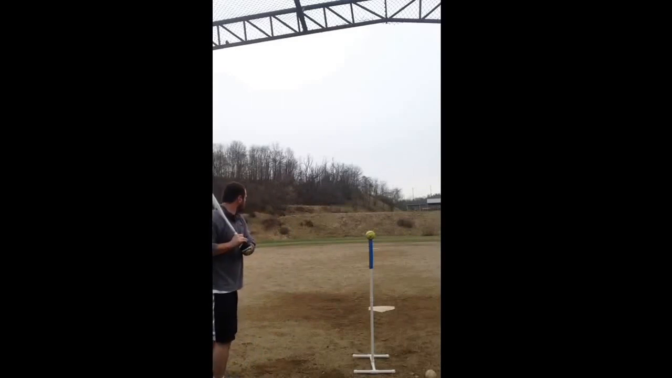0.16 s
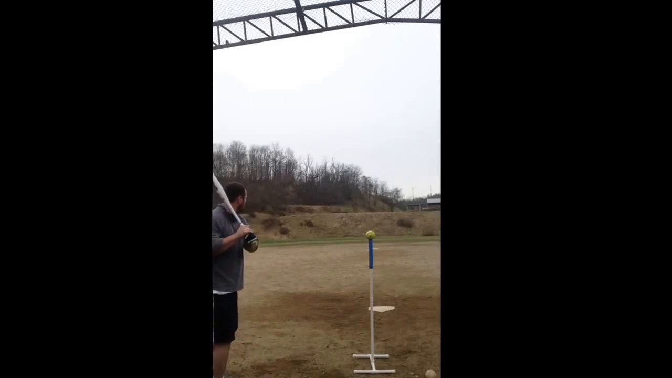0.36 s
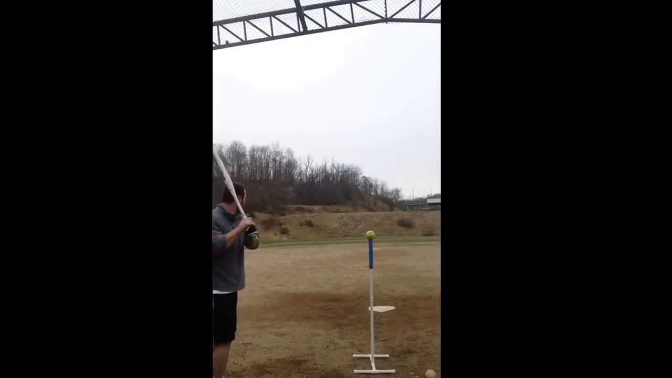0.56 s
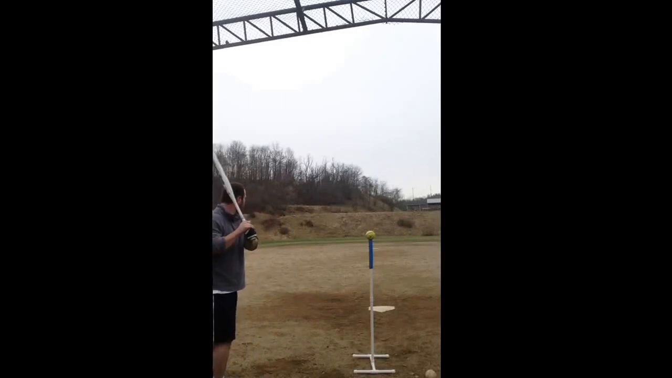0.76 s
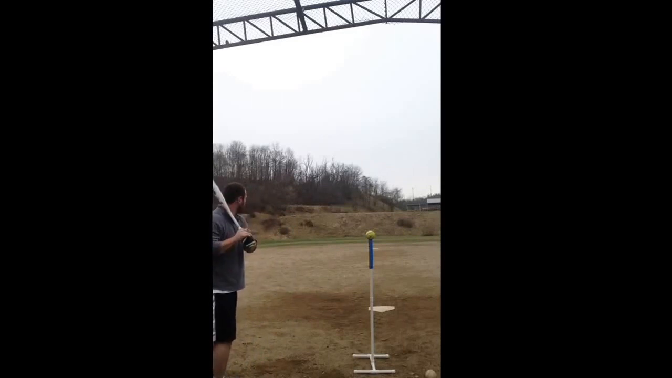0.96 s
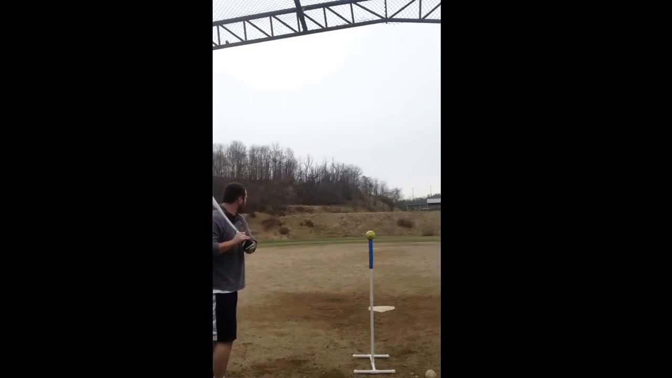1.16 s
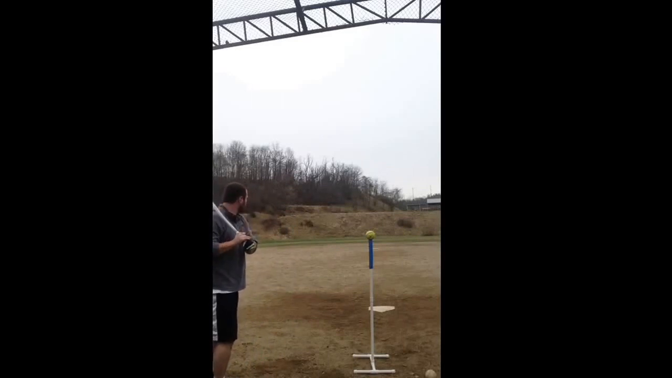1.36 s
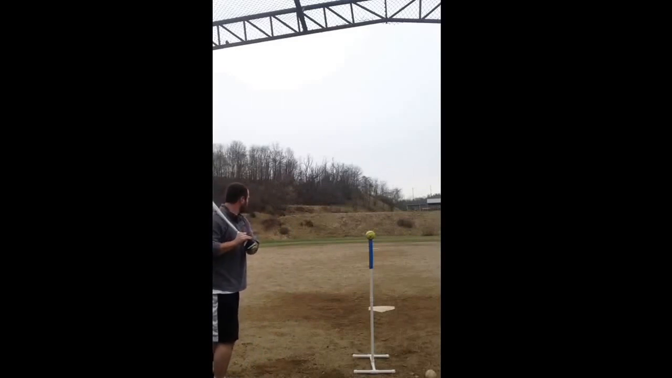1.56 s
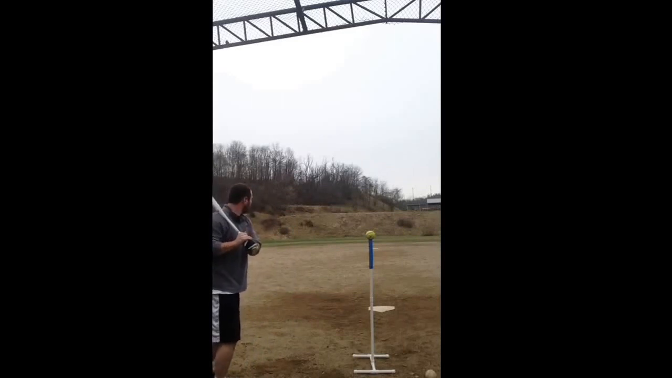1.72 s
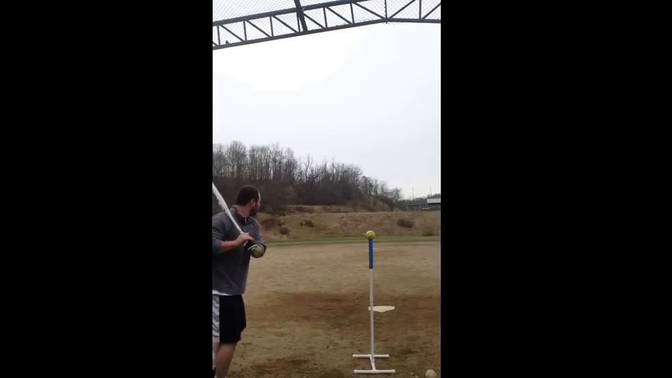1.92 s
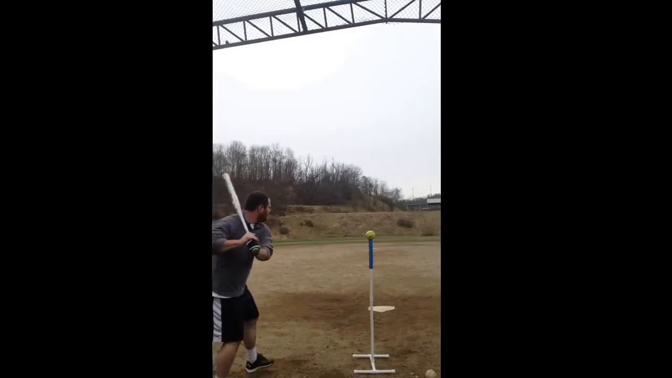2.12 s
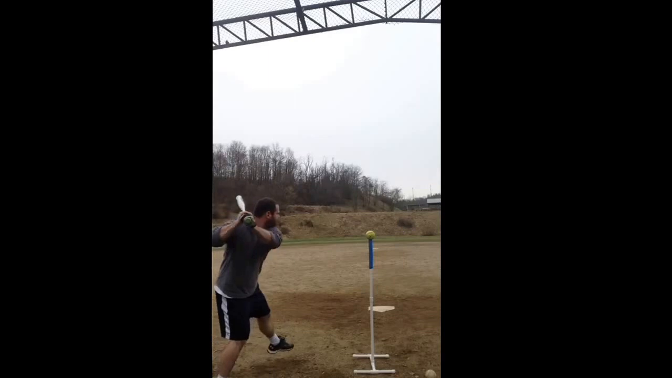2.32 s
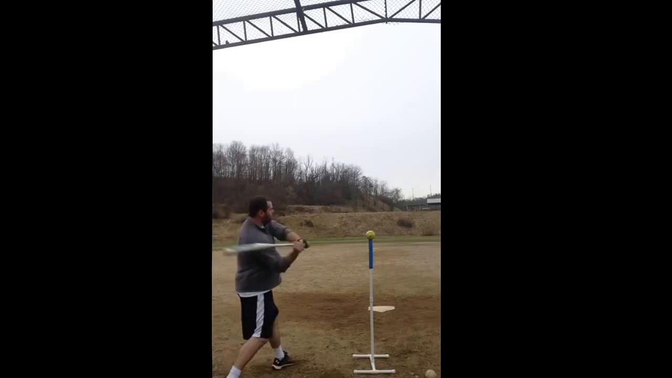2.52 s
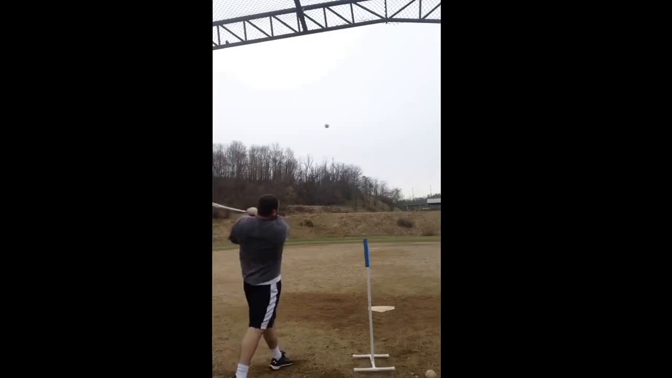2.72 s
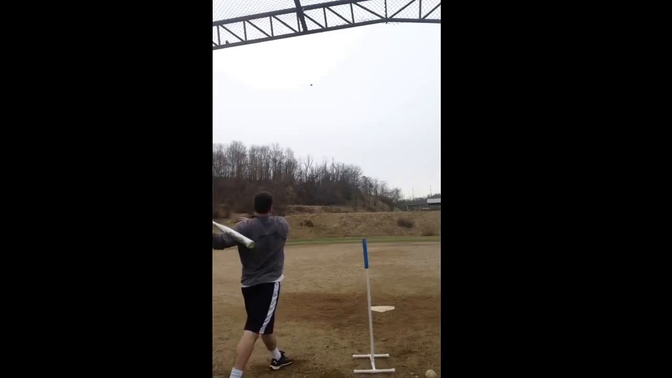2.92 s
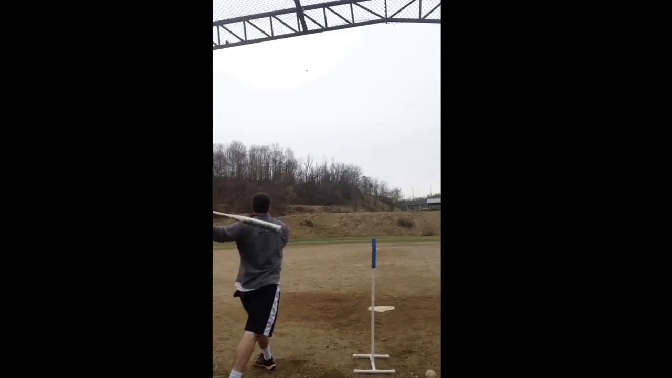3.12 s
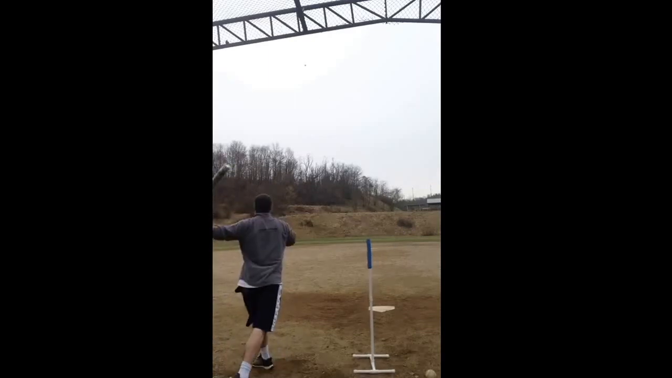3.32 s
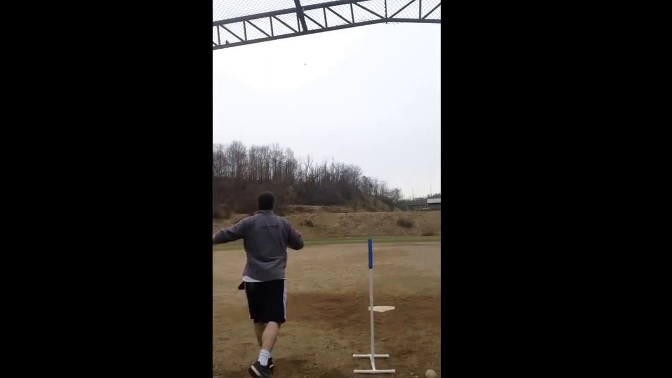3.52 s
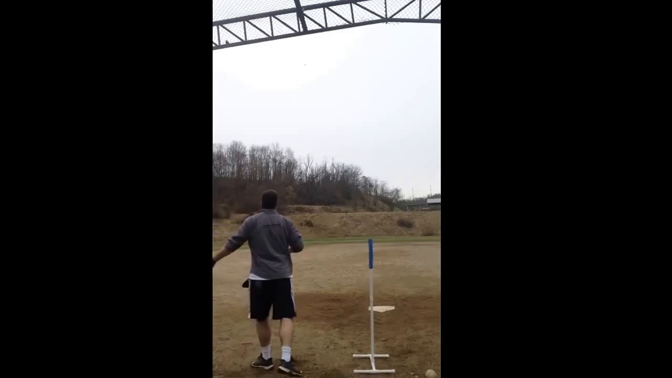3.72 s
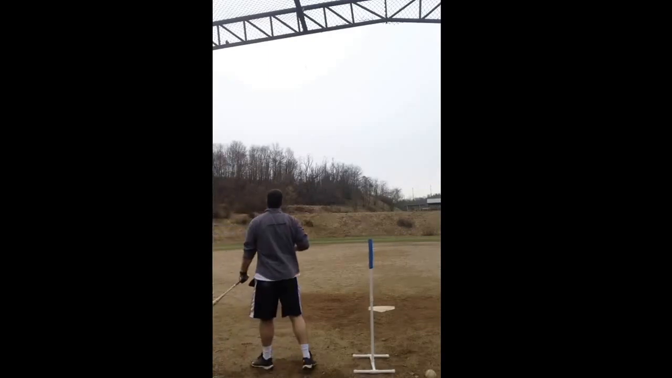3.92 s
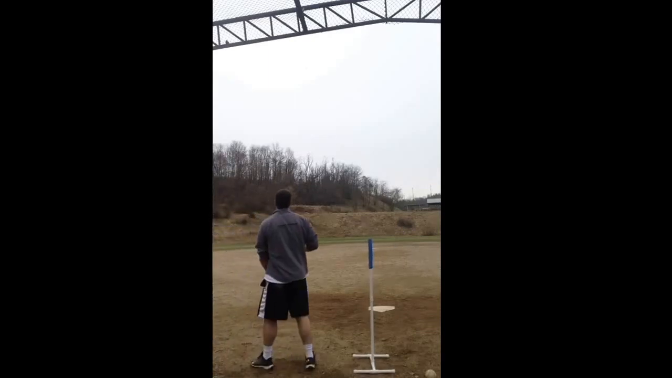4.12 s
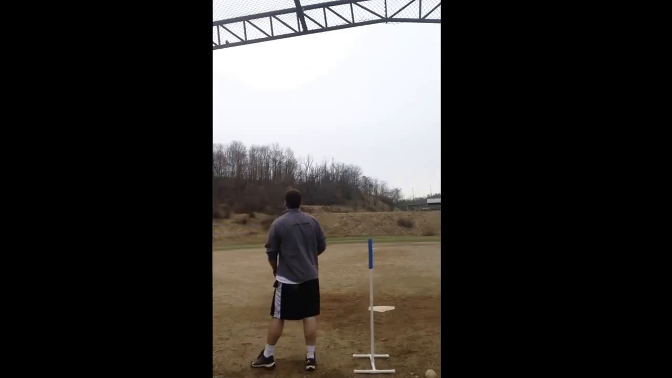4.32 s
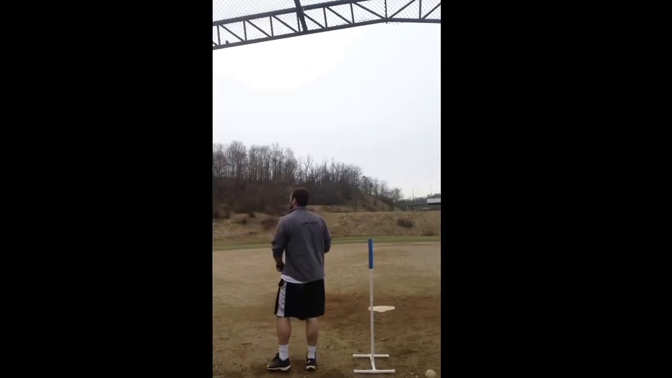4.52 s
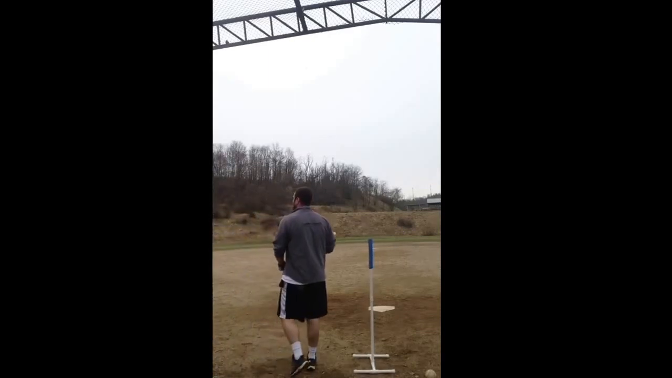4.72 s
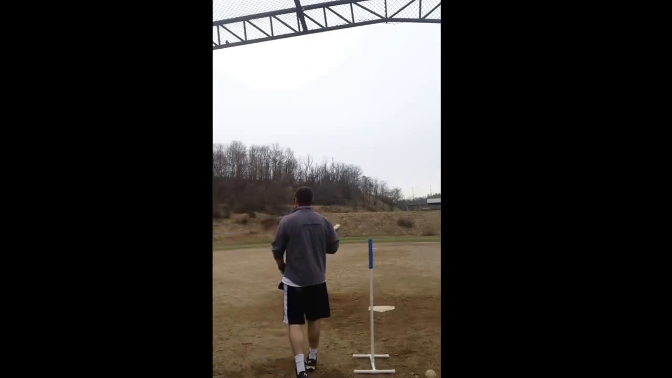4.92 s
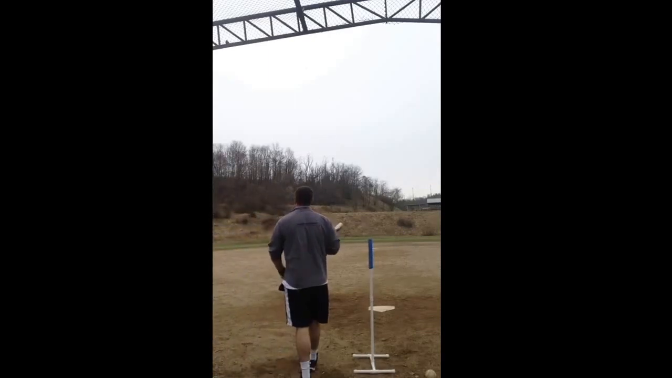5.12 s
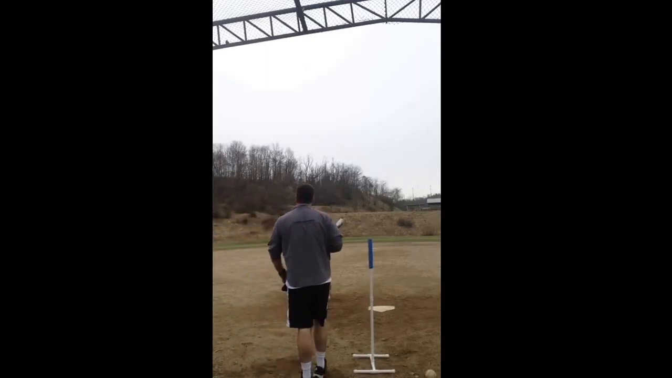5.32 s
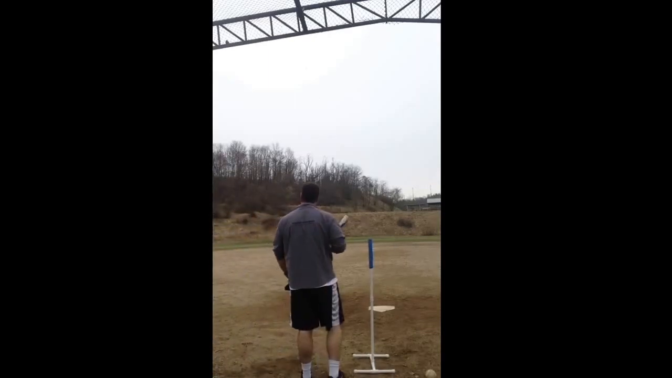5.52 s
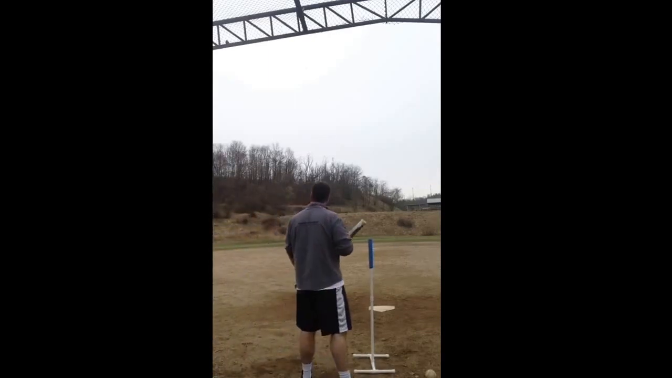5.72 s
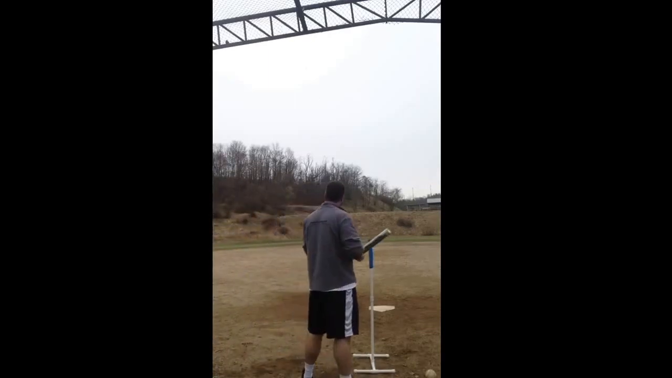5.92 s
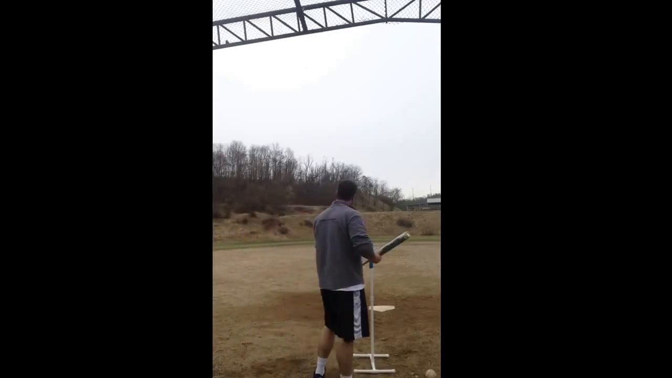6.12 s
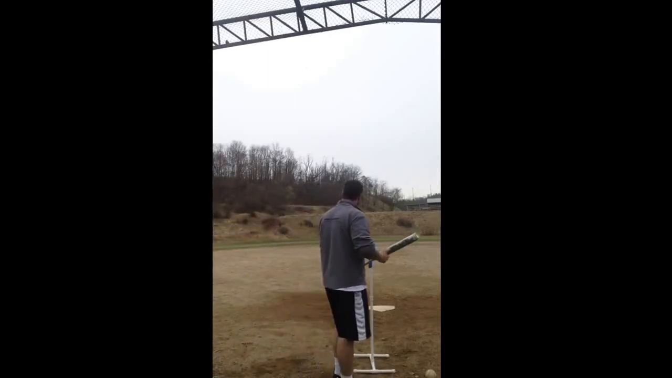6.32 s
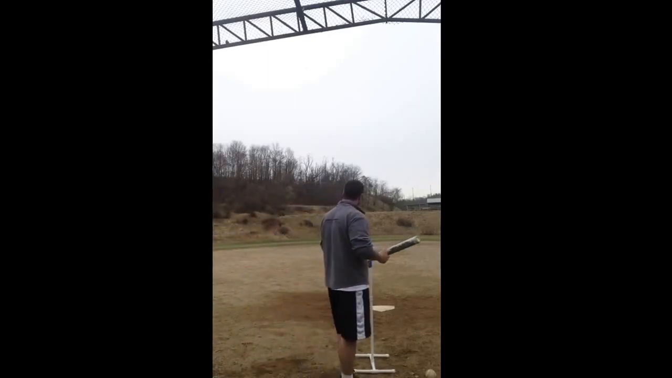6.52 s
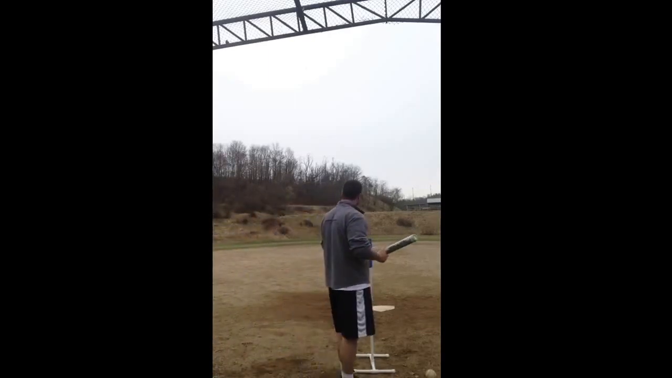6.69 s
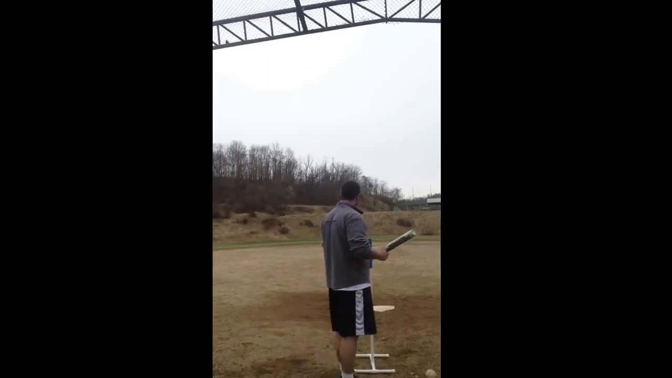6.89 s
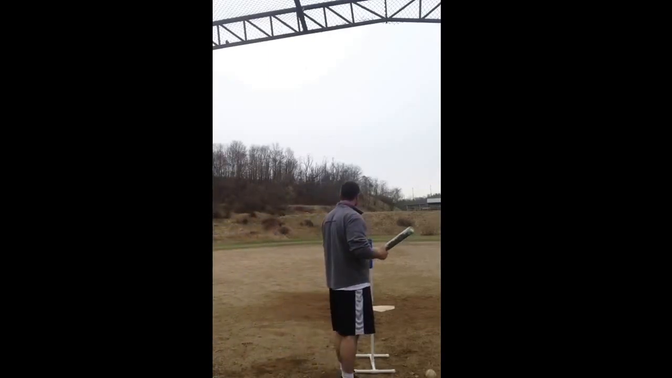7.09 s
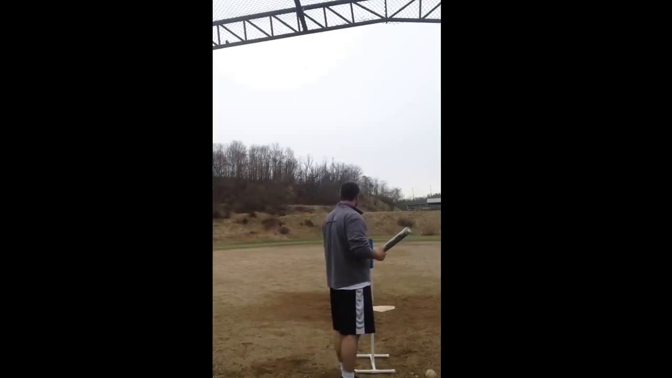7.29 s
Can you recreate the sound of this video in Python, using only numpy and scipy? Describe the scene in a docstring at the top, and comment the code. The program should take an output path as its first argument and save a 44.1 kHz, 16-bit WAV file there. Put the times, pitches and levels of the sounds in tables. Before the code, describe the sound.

A quiet open-air field heard by one microphone near a batter under a steel shelter. From 0 s, low road rumble and a faint far engine hum that fades until about 1.6 s; tiny bird chips at 0.3-0.8 s, a liquid warble and brief buzzy trill near 1 s, a slurred call at 1.5 s, and distant whistles around 2 s with tree echo. Shoes slide on grit at 2.3 s and stamp at 2.37 s. A short swish surges into a huge, sharp, dry bat crack at 2.57 s, with a very short shelter reflection and a faint far echo. The background is ducked, recovering slowly. Cloth rustle and light scuffs run to 3.2 s, a firmer step at 3.95 s, then soft ones at 4.2, 4.8 and 5.7 s. Birds sing again from 4 s. The engine's low drone, pulsing near 3.5 s, swells until 7.35 s.

```python
"""Softball struck off a tee

A batter plants his foot, swings and cracks a softball under an open steel shelter, then shuffles over dirt.
Damped modes and a noise snap make the blow; shaped noise makes its far echo, swish, cloth, grit and traffic.
Songbirds at the tree line are gliding sines with echoes; a far V8 drones closer as harmonics of its cycle.
An automatic gain control ducks at the crack and creeps back."""
import sys
import numpy as np
from scipy import signal
from scipy.fft import rfft, irfft, next_fast_len
from scipy.io import wavfile
from scipy.ndimage import uniform_filter1d, map_coordinates

SR = 44100
rng = np.random.default_rng(int(sys.argv[2]) if len(sys.argv) > 2 else 0)


def pcm_store(signal):
    """Save signal as 16-bit PCM."""
    levels = np.round(np.clip(np.atleast_2d(signal), -1, 1) * 32767)
    wavfile.write(sys.argv[1], SR, levels.astype(np.int16).T)


N = 324135
TIME = np.arange(N) / SR  # [s]


def amp(db):
    """Logarithmic level: decibels become a linear amplitude ratio."""
    return 10 ** (np.asarray(db) / 20)


def unit(x):
    """Normalization: scale a signal to an rms of 1."""
    return x / np.sqrt(np.mean(x ** 2) + 1e-20)


def along(points, hz):
    """Interpolation on a logarithmic frequency axis through (frequency [Hz], value) points."""
    f, v = np.transpose(points)
    return np.interp(np.log(hz + 1), np.log(f + 1), v)


def curves(rows):
    """Linear interpolation in time: one value per sample for each column after the time."""
    s, *columns = np.transpose(rows)
    return [np.interp(TIME, s, column) for column in columns]


def wobble(rate):
    """Band-limited random modulation: a spline through random knots, rate of them a second."""
    knots = rng.standard_normal(int(N * rate / SR) + 4)
    return map_coordinates(knots, [TIME * rate])


def filtered(x, response):
    """Linear filtering: multiply the spectrum by a response of frequency."""
    size = next_fast_len(len(x) + 8192)
    hz = np.fft.rfftfreq(size, 1 / SR)
    return irfft(rfft(x, size) * response(hz), size)[:len(x)]


def noise(spectrum, size=N):
    """Coloured noise: white noise shaped by a spectral density, at an rms of 1."""
    white = rng.standard_normal(size)
    return unit(filtered(white, lambda hz: amp(along(spectrum, hz))))


def add(track, s, sound):
    """Superposition: mix a sound into the track at time s."""
    part = track[max(0, round(s * SR)):][:len(sound)]
    part += sound[:len(part)]


def swell(s, hold, db, rise_db_per_s, fall_db_per_s):
    """Exponential growth and decay: the gain climbs to db at time s, holds and falls away."""
    below_before = rise_db_per_s * np.maximum(s - TIME, 0)
    below_after = fall_db_per_s * np.maximum(TIME - s - hold, 0)
    return amp(db - below_before - below_after)


def dying_noise(decay):
    """Frequency-dependent reverberation: a second of noise whose bands each die at their own rate."""
    hz, t, bins = signal.stft(rng.standard_normal(SR), SR, nperseg=256)
    t60 = along(decay, hz)[:, None]
    tail = signal.istft(bins * amp(-60 * t / t60), SR, nperseg=256)[1]
    return tail / np.linalg.norm(tail)


def echoes(x, decay, delay):
    """Diffuse reflection: the sound convolved with a decaying noise tail that starts after a delay."""
    wet = np.zeros(N)
    add(wet, delay, signal.fftconvolve(x, dying_noise(decay)))
    return wet


# Firing rate of the far engine, before its jitter: (time [s], rate [Hz])
FIRING_RATE = [(0, 88.73), (3.4, 88.07), (5.0, 89.1), (7.35, 87.52)]
# Drone of the far engine: (time [s], level [dB])
DRONE_LEVEL = [(0, -55.5), (1.6, -64), (2.8, -57.5), (3.5, -52), (4.2, -48.5), (6.0, -45), (6.35, -41.5),
               (7.35, -40.5)]
# Exhaust lines within the drone: (multiple of the eight-cylinder cycle rate [-], relative level [dB])
EXHAUST_LINES = [(5, -15.5), (6, -23), (7, -12.5), (8, 0.5), (9, -16.5), (11, -19), (12, -16), (13, -13),
                 (15, -16), (16, -19), (17, -22), (23, -22.5), (24, -22)]
# Spectral density of the engine's hiss: (frequency [Hz], relative density [dB per Hz])
ENGINE_HISS_SPECTRUM = [(500, -19.5), (1500, 0), (3500, -3), (7500, -13), (10000, -19.5)]
ENGINE_HISS_DB = -33.5  # over the drone
# Beating of the drone: centre, spread, rate and greatest depth (0-1)
THROB_S, THROB_SPREAD_S, THROB_HZ, THROB_DEPTH = 3.53, 0.83, 3.2, .6


def engine():
    """Periodic excitation: uneven cylinders put weaker lines around the firing tone, which beats for a while."""
    (firing_hz,), (drone_db,) = curves(FIRING_RATE), curves(DRONE_LEVEL)
    jittered_hz = firing_hz * (1 + .003 * wobble(4))
    cycle = np.cumsum(jittered_hz) / SR / 8  # eight firings a cycle
    lines = np.zeros(N)
    for multiple, db in EXHAUST_LINES:
        level = amp(db + 0.33 * wobble(6.0))
        lines += level * np.sin(2 * np.pi * (multiple * cycle + rng.random()))
    since = TIME - THROB_S
    depth = THROB_DEPTH * np.exp(-(since / THROB_SPREAD_S) ** 2)
    throb = 1 + depth * np.cos(2 * np.pi * THROB_HZ * since)
    hiss = amp(ENGINE_HISS_DB) * noise(ENGINE_HISS_SPECTRUM)
    return amp(drone_db) * (np.sqrt(2) * throb * lines + hiss)


# Spectral density of the low rumble: (frequency [Hz], relative density [dB per Hz])
RUMBLE_SPECTRUM = [(25, -25.5), (40, -16.5), (55, -0.5), (95, 1.5), (130, -1.5), (190, -6), (300, -14.5),
                   (500, -34.5), (1200, -70)]
# Spectral density of tyre noise: (frequency [Hz], relative density [dB per Hz])
TYRE_SPECTRUM = [(100, -32.5), (280, -2.5), (420, -1), (560, 1), (700, -1), (900, -3.5), (1300, -11),
                 (2000, -14), (3200, -21.5), (5000, -32.5), (7300, -32), (9500, -38.5)]
RUMBLE_DB, ENGINE_RUMBLE_DB = -55.5, -10.5  # steady, from far roads; the engine's, over its drone
TYRE_DB, TYRE_SWING_DB = -60, 1.5  # middle level and its slow swing either way
TYRE_LULL_S, TYRE_PERIOD_S = 2.5, 8.1  # time of the lull; from one wave of traffic to the next


def traffic():
    """Incoherent addition: steady and engine rumble sum in power, under slow waves of far tyre noise."""
    drone_db, = curves(DRONE_LEVEL)
    rumble_level = np.hypot(amp(RUMBLE_DB), amp(drone_db + ENGINE_RUMBLE_DB))
    rumble = rumble_level * amp(1.2 * wobble(13)) * noise(RUMBLE_SPECTRUM)
    wave_db = -TYRE_SWING_DB * np.cos(2 * np.pi * (TIME - TYRE_LULL_S) / TYRE_PERIOD_S)
    tyres = amp(TYRE_DB + wave_db + 0.9 * wobble(10)) * noise(TYRE_SPECTRUM)
    return rumble + tyres


def whistle(length, pitches_hz):
    """Frequency modulation: a soft-edged sine glides through three pitches; faster sweeps quaver more."""
    u = np.linspace(0, 1, round(length * SR))
    pitch = np.polyval(np.polyfit([0, .5, 1], pitches_hz, 2), u)
    quaver_hz = .0035 * abs(pitches_hz[2] - pitches_hz[0]) / length
    pitch = pitch + quaver_hz * np.sin(2 * np.pi * (260 * length * u + rng.random()))
    edges = signal.windows.tukey(len(u), .6)
    return np.sqrt(2) * edges * np.sin(2 * np.pi * np.cumsum(pitch) / SR)


def phrase(notes):
    """Sequence of tones: a run of whistled notes, some overlapping."""
    sound = np.zeros(SR // 4)
    for s, length, *pitches_hz, db in notes:
        add(sound, s, amp(db) * whistle(length, pitches_hz))
    return sound


def glide(length, hz, octaves):
    """Portamento: a whistle slides by a number of octaves about its pitch."""
    return whistle(length, hz * 2 ** (octaves * np.array([-.5, 0, .5])))


# Three figures of birdsong, the chip being a soft dip and a quick upstroke: (time into the figure [s],
# length [s], start pitch [Hz], middle pitch [Hz], end pitch [Hz], relative level [dB])
WARBLE_NOTES = [(0, .032, 3400, 3030, 2630, -1), (.047, 0.031, 2150, 2510, 2760, -6),
                (.066, 0.029, 2850, 2973, 2760, 2.5), (.094, .016, 2500, 3250, 2900, -4.5),
                (.105, 0.0545, 2820, 2340, 2300, -9.5)]
SLUR_NOTES = [(0, 0.0266, 3330, 3010, 2820, -7), (.024, 0.029, 3550, 3020, 2770, 1),
              (.039, .095, 2800, 2430, 2320, -2), (.128, .055, 2370, 2433, 2726, -6)]
CHIP_NOTES = [(0, .023, 3920, 3467, 3350, -9), (.022, 0.018, 3800, 4247, 5000, 2.5)]
# The near singer's turns: (warble time [s], warble level [dB], slur time [s], slur level [dB])
SONG_TURNS = [(0.94, -55.5, 1.463, -51.5), (4.059, -55.5, 4.623, -58.5)]
# A small bird's chips: (time [s], level [dB])
CHIP_CALLS = [(.257, -77), (.373, -76.5), (.474, -72), (.592, -73), (0.706, -66), (.793, -70.5),
              (1.333, -74), (1.715, -75)]
# Plain whistles farther off: (time [s], length [s], pitch [Hz], glide [octaves], level [dB])
FAR_WHISTLES = [(.772, .036, 6550, .15, -78), (1.081, 0.13, 2130, -0.07, -74.5),
                (1.671, 0.073, 3150, .09, -68), (1.949, 0.026, 2620, -.27, -64),
                (1.966, .045, 2790, .03, -63), (1.97, .18, 2200, .04, -73), (1.977, .094, 4540, -.06, -72),
                (2.027, .031, 3350, .16, -63), (2.274, .026, 5650, -.7, -68),
                (4.372, 0.091, 2850, 0.1, -74), (5.125, 0.044, 7350, .25, -71.5),
                (5.202, 0.036, 2720, -.02, -66), (5.287, 0.036, 2330, 0, -63),
                (5.427, 0.068, 3630, 0.07, -75.5), (5.792, 0.062, 3370, 0, -66.5),
                (5.85, .042, 3750, 0, -74), (6.182, 0.093, 3770, 0, -73.5), (6.274, 0.067, 2930, .25, -63),
                (6.386, 0.063, 2980, .1, -63), (6.825, 0.066, 2750, -.05, -64),
                (6.87, 0.063, 2330, -.08, -66)]
# Spectral density of the buzzy trill: (frequency [Hz], relative density [dB per Hz])
TRILL_SPECTRUM = [(2500, -40.5), (3500, -7), (4400, -1), (4900, -11), (6000, -40)]
# Decay of the trees' echo: (frequency [Hz], t60 [s])
TREE_DECAY = [(1500, 0.86), (3000, 0.68), (8000, 0.51)]
NEAR_ECHO_DB, FAR_ECHO_DB = -11.5, -4  # what the trees send back
TRILL_S, TRILL_HOLD_S, TRILL_DB = .99, 0.072, -72  # level before the buzz
TRILL_FADE_DB_PER_S, TRILL_HZ = 250, 108  # fade in and out; buzz rate
# Faintest birds: least level sent to the echo, length, lowest centre pitch, range of pitch
TWITTER_DB, TWITTER_LENGTH_S, TWITTER_LOW_HZ, TWITTER_OCTAVES = -74, .04, 2500, .6


def birds():
    """Direct-to-reverberant ratio: farther birds get more tree echo, and faint twitter is echo alone."""
    near, far, twitter = np.zeros((3, N))
    for warble_s, warble_db, slur_s, slur_db in SONG_TURNS:
        add(near, warble_s, amp(warble_db) * phrase(WARBLE_NOTES))
        add(near, slur_s, amp(slur_db) * phrase(SLUR_NOTES))
    for s, db in CHIP_CALLS:
        add(near, s, amp(db) * phrase(CHIP_NOTES))
    for s, length, hz, octaves, db in FAR_WHISTLES:
        add(far, s, amp(db) * glide(length, hz, octaves))
    for when, pitch, bend, loud in rng.random((30, 4)):
        hz = TWITTER_LOW_HZ * 2 ** (TWITTER_OCTAVES * pitch)
        note = glide(TWITTER_LENGTH_S, hz, .7 * (bend - .5))
        add(twitter, when * N / SR, amp(TWITTER_DB + 6 * loud) * note)
    envelope = swell(TRILL_S, TRILL_HOLD_S, TRILL_DB, TRILL_FADE_DB_PER_S, TRILL_FADE_DB_PER_S)
    buzz = amp(2.4 * np.sin(2 * np.pi * TRILL_HZ * TIME))
    trill = envelope * buzz * noise(TRILL_SPECTRUM)
    flutter = amp(2.2 * wobble(110))
    scattered = amp(NEAR_ECHO_DB) * near + amp(FAR_ECHO_DB) * far + twitter
    return (near + far) * flutter + trill + echoes(scattered, TREE_DECAY, delay=0.014)


# Soft broad swells, cloth in the wind-up and follow-through; the one at 2.657 s is the blow's far echo:
# (time [s], hold [s], level before flutter [dB])
SOFT_SWELLS = [(1.885, 0.038, -75), (2.657, 0.019, -56.5), (2.851, 0.21, -68)]
# Spectral density shared by the swells: (frequency [Hz], relative density [dB per Hz])
SWELL_SPECTRUM = [(300, -13), (1000, -2), (3000, 1), (7000, -2), (10000, -6), (15000, -11)]
SWELL_RISE_DB_PER_S, SWELL_FALL_DB_PER_S = 64.5, 111


def clothes_and_far_echo():
    """Broadband noise: fluttering swells for cloth in wind-up and follow-through, and the blow's far echo."""
    level = np.zeros(N)
    for s, hold, db in SOFT_SWELLS:
        level += swell(s, hold, db, SWELL_RISE_DB_PER_S, SWELL_FALL_DB_PER_S)
    return level * amp(1.5 * wobble(60)) * noise(SWELL_SPECTRUM)


# Shoes on dirt: (time [s], level [dB], length [s], t60 [s])
SHOE_SCUFFS = [(2.275, -57, .15, 0.26), (2.369, -39.5, .02, .105), (2.472, -48.5, 0.0086, 0.023),
               (2.735, -57.5, 0.036, 0.077), (2.887, -55.5, 0.072, 0.34), (3.049, -61.5, 0.085, .15),
               (3.21, -63.5, .072, 0.067), (3.947, -50, .026, 0.041), (4.216, -67.5, 0.037, 0.13),
               (4.774, -65.5, .06, 1.1), (5.697, -69, 0.052, 0.65)]
# Spectral density of grit before the tilt: (frequency [Hz], relative density [dB per Hz])
GRIT_SPECTRUM = [(100, -4.5), (400, -4.5), (800, -9), (1400, -0.5), (2500, 0), (4000, -2.5), (7000, -7),
                 (10000, -15.5), (15000, -23.5)]
# Decay under the steel shelter: (frequency [Hz], t60 [s])
SHELTER_DECAY = [(100, 0.13), (350, 0.15), (900, 0.16), (2500, 0.17), (6000, 0.1), (14000, .17)]
# A slide twice as long is this much brighter per octave; the length with untilted colour
SLIDE_TILT_DB, PLAIN_SCUFF_S = 3, 0.035
FULL_SLIDE_S = 0.16  # from this length on, weight builds to the end; shorter scuffs take it sooner


def shoes():
    """Granular friction: each scuff grinds a dense spray of grit; short stamps are dull, long slides bright."""
    track, t = np.zeros(N), np.arange(SR) / SR
    for s, db, length, t60 in SHOE_SCUFFS:
        tilt_db = SLIDE_TILT_DB * np.log2(length / PLAIN_SCUFF_S)
        # random grain sizes give the noise sharp peaks
        grains = rng.standard_normal(len(t)) * amp(1.7 * rng.standard_normal(len(t)))
        colour = lambda hz: amp(along(GRIT_SPECTRUM, hz) + tilt_db * np.log2(hz / 2000 + .05))
        grit = unit(filtered(grains, colour))
        rise = length * min(length / FULL_SLIDE_S, 1)
        pressure = np.minimum(t / rise, 1) * 1000 ** (-np.maximum(t - length, 0) / t60)
        add(track, s, amp(db) * pressure * grit)
    return track + amp(-14.0) * echoes(track, SHELTER_DECAY, delay=0.0029)


# Spectral density of the low eddies: (frequency [Hz], relative density [dB per Hz])
BUFFET_SPECTRUM = [(25, -46.5), (50, -24.5), (80, -4), (110, -3.5), (170, -11.5), (350, -17.5), (700, -32),
                   (2000, -68.5)]
# Spectral density of the swish: (frequency [Hz], relative density [dB per Hz])
SWISH_SPECTRUM = [(150, -16), (350, 0), (480, -4.5), (850, 1), (1600, -7.5), (2700, -9), (4000, -14.5),
                  (5400, -5), (7000, -14), (15000, -22)]
HIT_S = 2.5667  # moment of contact
SWISH_DB, SWISH_RISE_DB_PER_S = -32, 460  # peaks at contact
BUFFET_DB, BUFFET_RISE_DB_PER_S, BUFFET_LEAD_S = -35, 379, 0.031  # peaks this early, holds to contact
SWING_FALL_DB_PER_S = 560


def swing():
    """Aeroacoustic noise: the bat sheds low eddies and a swish that swells up to contact."""
    buffet = swell(HIT_S - BUFFET_LEAD_S, BUFFET_LEAD_S, BUFFET_DB, BUFFET_RISE_DB_PER_S, SWING_FALL_DB_PER_S)
    swish = swell(HIT_S, 0, SWISH_DB, SWISH_RISE_DB_PER_S, SWING_FALL_DB_PER_S)
    return buffet * noise(BUFFET_SPECTRUM) + swish * noise(SWISH_SPECTRUM)


# Modes of bat barrel and ball: (frequency [Hz], relative level [dB], t60 [s])
BAT_MODES = [(302, -22.5, 0.034), (692, -10, .032), (848, -12, 0.042), (1134, -4, .022), (1340, -26, 0.031),
             (1810, -16.5, 0.041), (2100, -10, 0.016), (2370, -12.5, .026), (2866, -28, .035),
             (3550, -26.5, 0.049), (4400, -21.5, .025), (5330, -12, 0.017)]
# Spectral density of the snap: (frequency [Hz], relative density [dB per Hz])
CRACK_SPECTRUM = [(200, -15.5), (480, -11.5), (750, 3.5), (1500, -5.5), (2200, -2.5), (3200, -11),
                  (4200, -4), (5400, 3), (7500, -9), (10000, -4), (13000, -5.5), (16000, -8)]
# Colour of what ground and shelter send back: (frequency [Hz], relative density [dB per Hz])
SCATTER_SPECTRUM = [(120, -13), (260, -6), (340, 1), (470, -11), (830, 1.5), (1500, -6), (2400, -4.5),
                    (3200, -10), (4000, -7.5), (7000, -13.5), (11000, -17), (15000, -17.5)]
CONTACT_RISE_S, BLOW_DB = .00018, 8.5  # time constant of the modes' build-up; gain of the whole blow
# Snap and its short tail, relative to the whole blow
SNAP_DB, SNAP_T60_S, SNAP_TAIL_DB, SNAP_TAIL_T60_S = -11.5, 0.0063, -17.5, 0.023
ANSWER_DELAY_S, ANSWER_DB = 0.0021, 14.5  # ground and shelter answer, relative to the whole blow


def hit():
    """Modal impact: the ball flattens on the barrel with a snap, damped modes and the shelter's broad answer."""
    t = np.arange(SR // 4) / SR
    fade = lambda t60: 1000 ** (-t / t60)
    ring = np.zeros(len(t))
    for k, (hz, db, t60) in enumerate(BAT_MODES):
        # neighbouring modes push the air in opposite directions
        ring += (-1) ** k * amp(db) * fade(t60) * np.sin(2 * np.pi * hz * t)
    ring = ring * (1 - np.exp(-t / CONTACT_RISE_S))
    snap = amp(SNAP_DB) * fade(SNAP_T60_S) + amp(SNAP_TAIL_DB) * fade(SNAP_TAIL_T60_S)
    crack = snap * noise(CRACK_SPECTRUM, size=len(t))
    answer = filtered(dying_noise(SHELTER_DECAY), lambda hz: amp(along(SCATTER_SPECTRUM, hz)))
    track = np.zeros(N)
    add(track, HIT_S, ring + crack)
    add(track, HIT_S + ANSWER_DELAY_S, amp(ANSWER_DB) * answer)
    return amp(BLOW_DB) * track


def scene():
    """Linear superposition: the pressures of all sources add at one microphone."""
    return (engine() + traffic() + birds() + clothes_and_far_echo() + shoes() + swing() + hit())[None]


def gain_control(x, ceiling_db, recovery_db):
    """Dynamic limiting: level over the ceiling pulls the gain down; it returns at recovery_db a second."""
    power = uniform_filter1d(x ** 2, size=220)  # mean over 5 ms
    level_db = 10 * np.log10(np.abs(power) + 1e-12)
    excess = np.maximum(level_db - ceiling_db, 0)
    # the largest cut so far, less what has since recovered
    cut = np.maximum.accumulate(excess + recovery_db * TIME) - recovery_db * TIME
    return x * amp(-cut)


# Spectral density of the electronic hiss: (frequency [Hz], relative density [dB per Hz])
HISS_SPECTRUM = [(1000, -3), (4000, 0), (7500, -1), (10000, 0.5), (15000, -1)]


def record(dry):
    """Transducer limits: automatic gain, added hiss, clipping and a band limit that closes at 15.5 kHz."""
    held = gain_control(dry[0], ceiling_db=-9.5, recovery_db=6.5) + amp(-79.0) * noise(HISS_SPECTRUM)
    held = np.clip(held, -.9, .9)
    return filtered(held, lambda hz: np.clip((15500 - hz) / 500, 0, 1))[None]


dry = scene()
out = record(dry)
pcm_store(out)
```